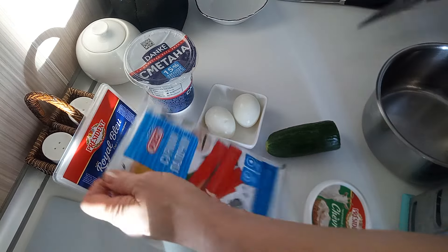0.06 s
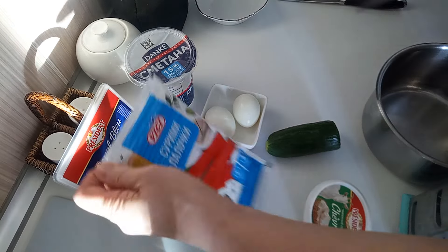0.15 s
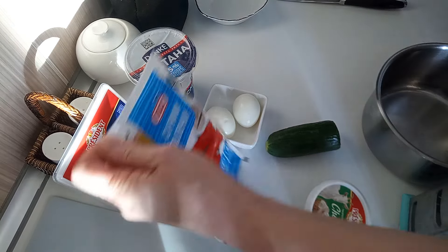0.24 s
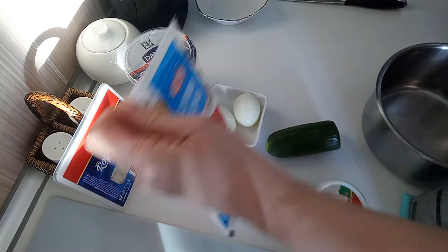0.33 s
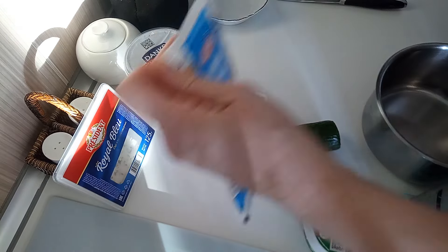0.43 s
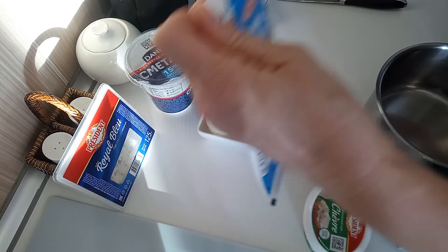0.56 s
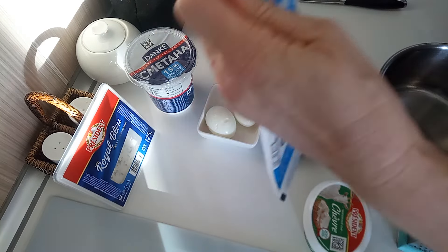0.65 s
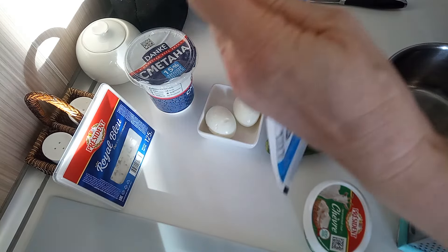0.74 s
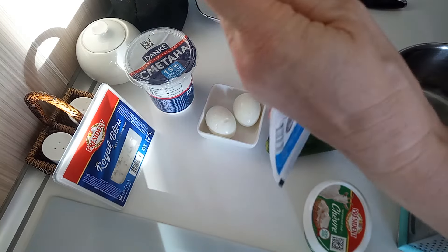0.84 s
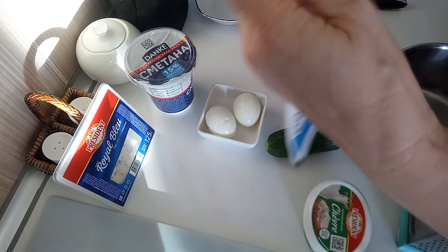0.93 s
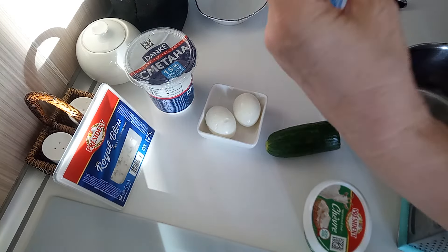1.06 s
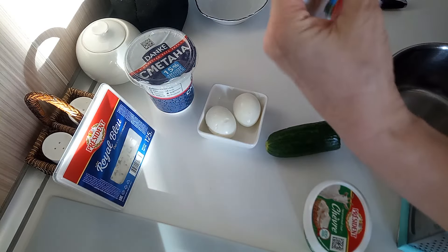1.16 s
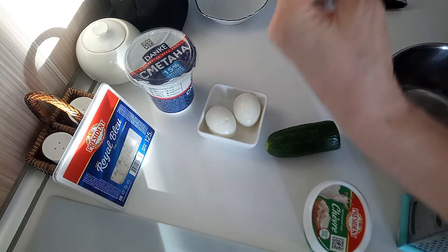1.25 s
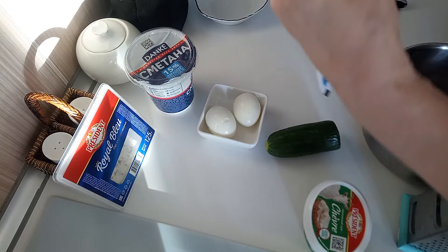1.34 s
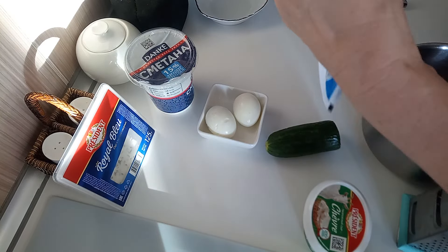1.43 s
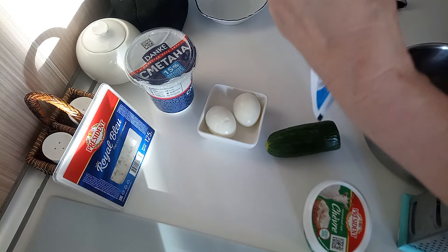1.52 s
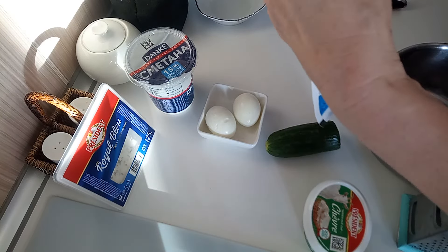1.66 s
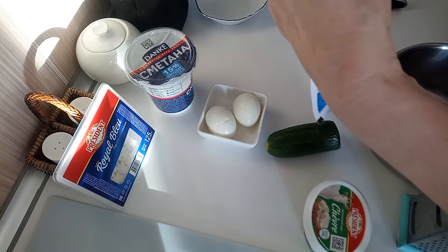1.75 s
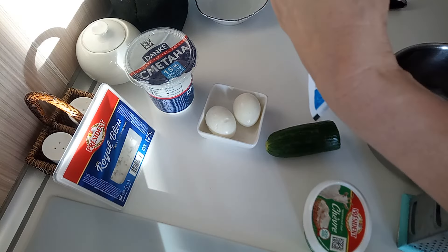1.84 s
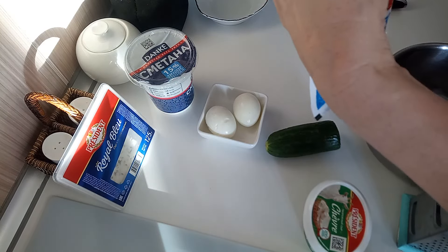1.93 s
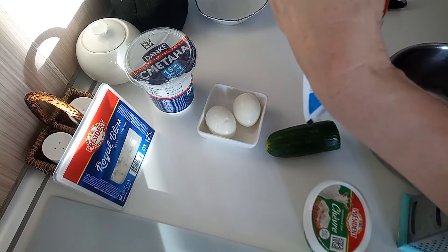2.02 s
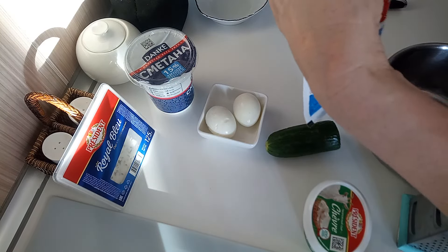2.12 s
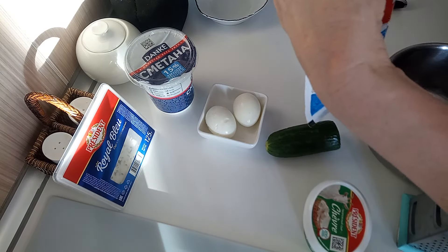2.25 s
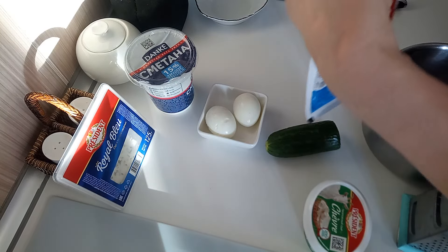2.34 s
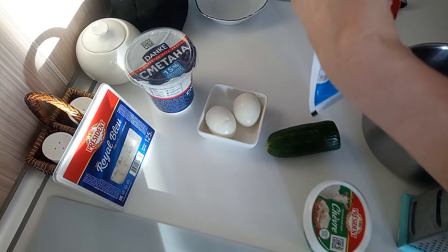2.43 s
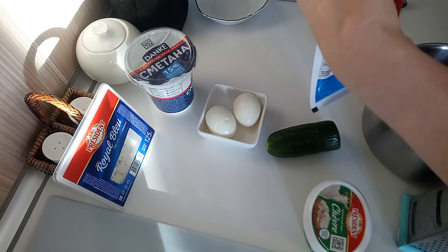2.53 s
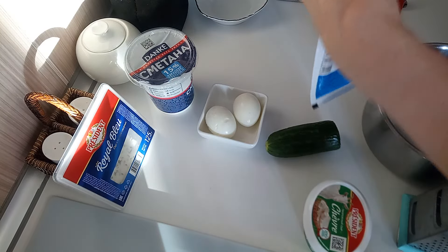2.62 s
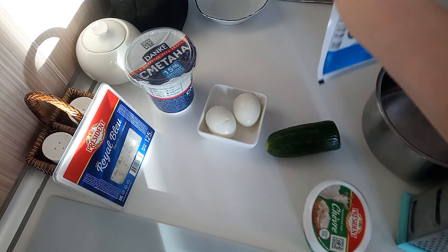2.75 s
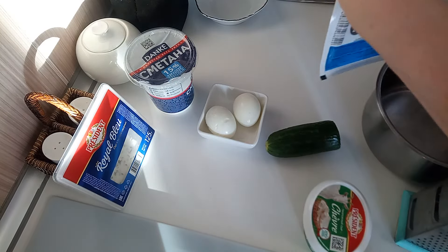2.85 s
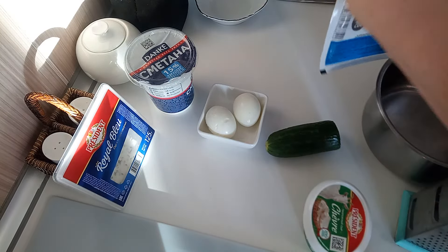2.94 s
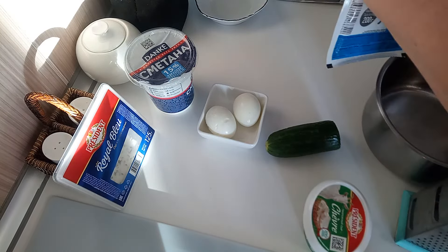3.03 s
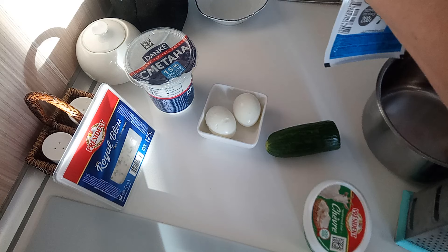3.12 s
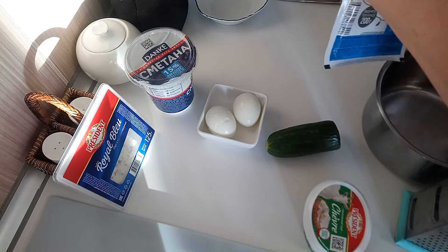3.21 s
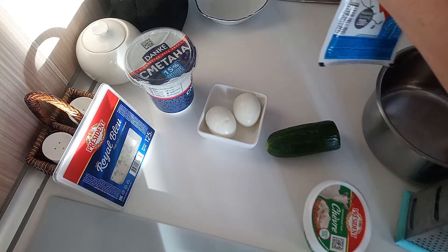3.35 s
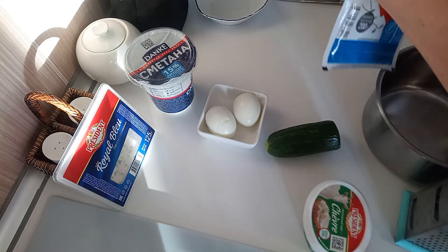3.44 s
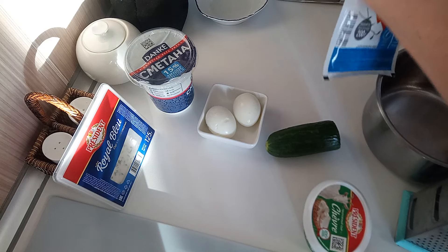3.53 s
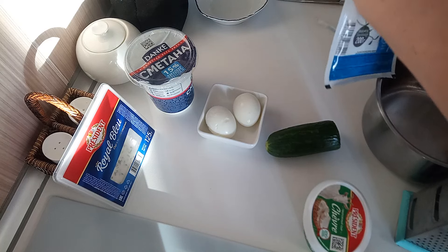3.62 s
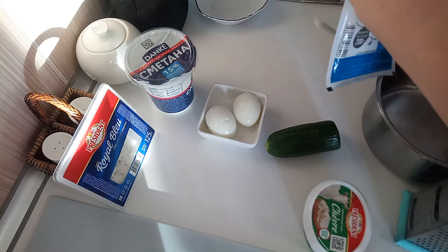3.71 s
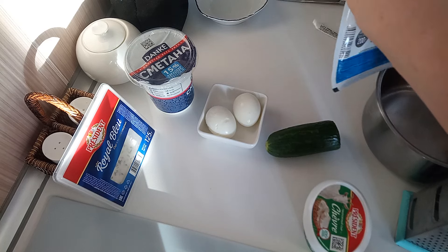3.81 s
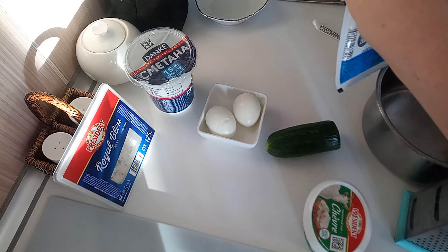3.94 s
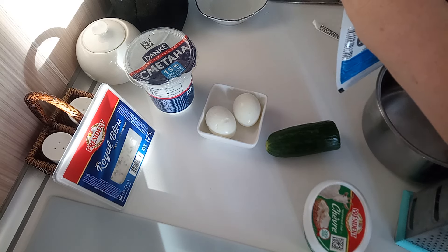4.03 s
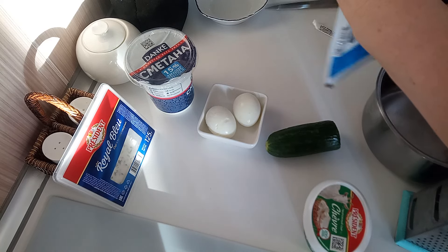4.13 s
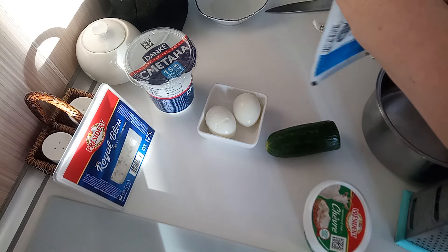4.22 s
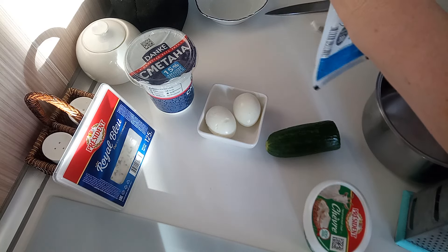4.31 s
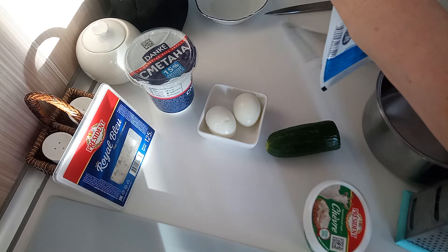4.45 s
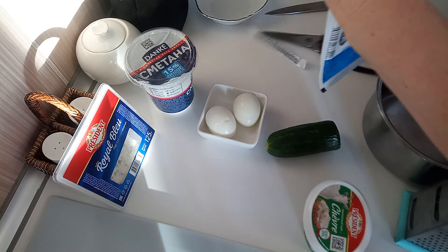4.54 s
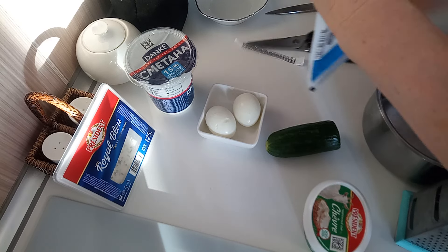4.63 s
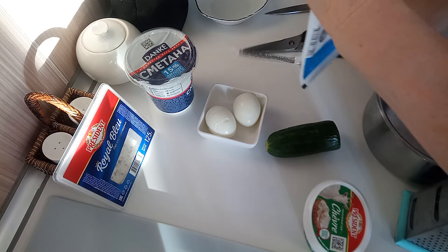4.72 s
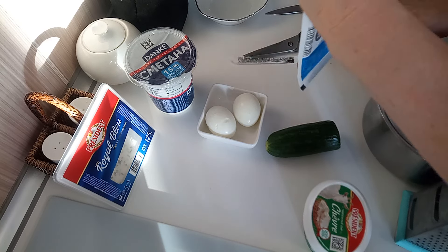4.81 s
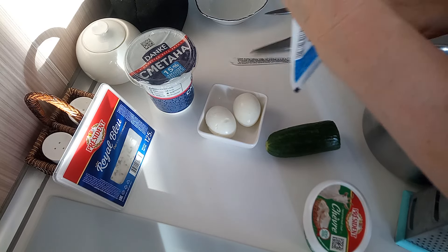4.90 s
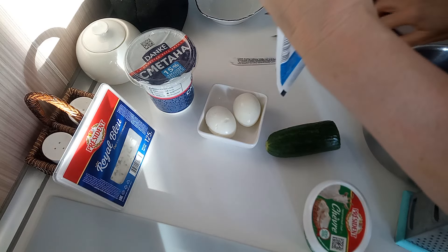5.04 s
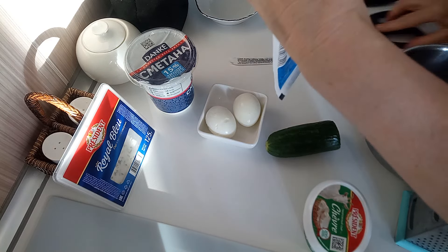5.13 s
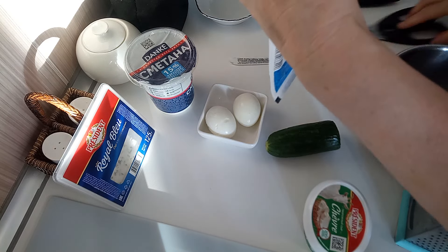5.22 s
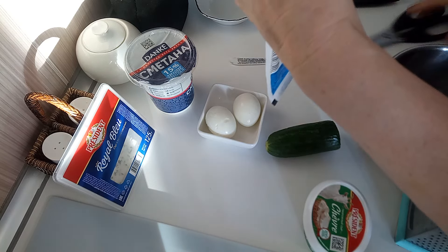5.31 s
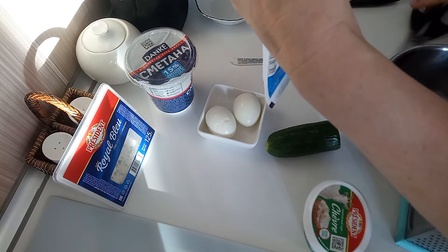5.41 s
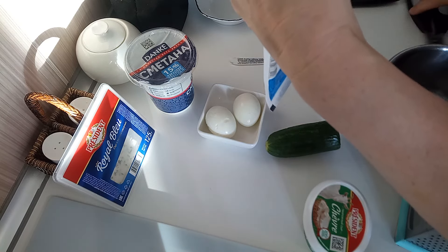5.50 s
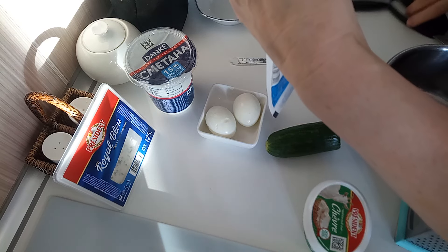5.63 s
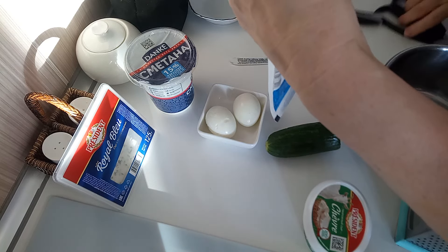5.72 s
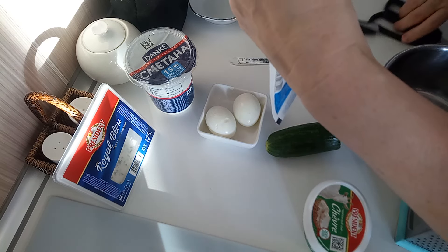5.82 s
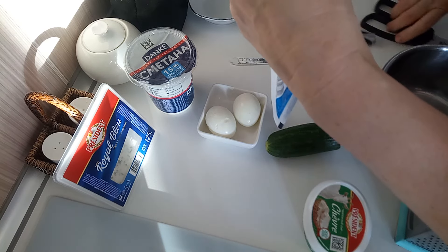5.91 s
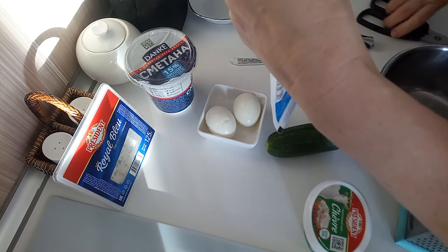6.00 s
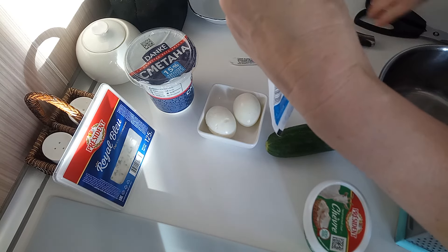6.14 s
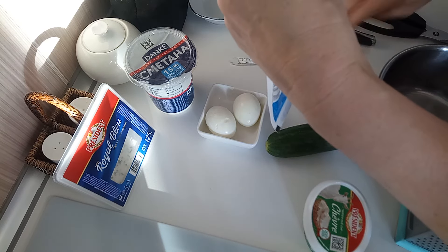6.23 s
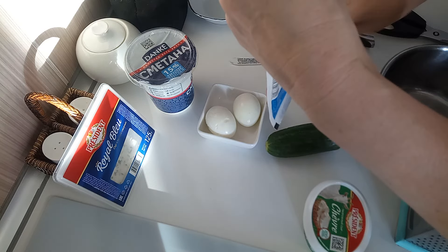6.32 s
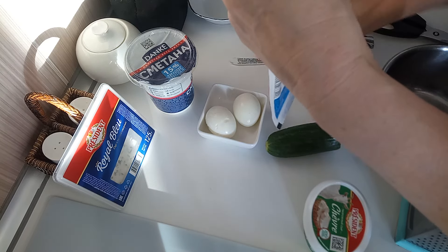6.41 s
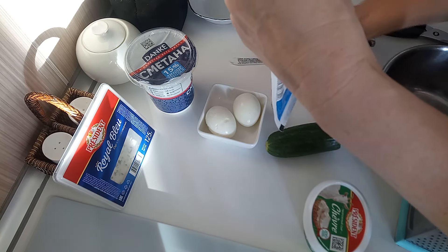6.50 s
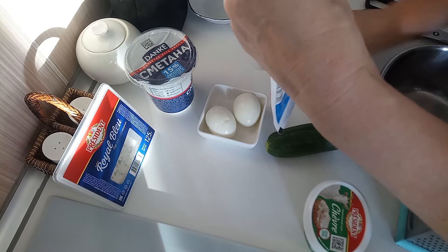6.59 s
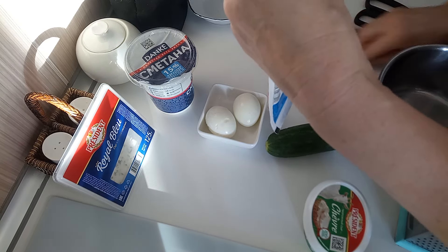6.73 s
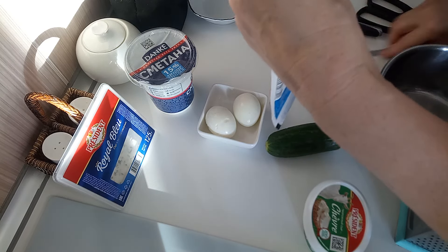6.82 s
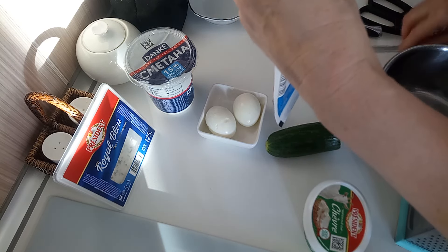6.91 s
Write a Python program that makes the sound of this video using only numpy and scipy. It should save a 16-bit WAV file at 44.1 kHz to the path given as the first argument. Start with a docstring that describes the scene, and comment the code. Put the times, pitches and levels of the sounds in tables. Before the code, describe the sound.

Quiet film crackle and clicks in a kitchen, followed by a much louder metallic clatter, a lingering knife ring and a hollow dragging scrape.

```python
"""In a small kitchen, close up, a plastic food packet is lifted off the counter and crinkles in the hand.
Steel scissors clatter among other utensils, set a knife blade ringing, then drag over the worktop.
Film is sprayed crackle and sharp snaps through shifting resonances; steel is noise cracks and decaying modes;
the drag is a scrape over a hollow drone. Soft bumps, a short reverberation and a faint hush lie beneath."""
import sys
import numpy as np
from scipy import signal
from scipy.fft import rfft, irfft, next_fast_len
from scipy.io import wavfile
from scipy.ndimage import uniform_filter1d, map_coordinates

SR = 44100
rng = np.random.default_rng(int(sys.argv[2]) if len(sys.argv) > 2 else 0)


def digitize_waveform(pressure):
    """Quantize a signal to 16-bit integers and store it at the path in sys.argv[1].

    Rows of a 2-D input are taken as channels; values are limited to [-1, 1].
    """
    field = np.atleast_2d(pressure).T
    bounded = np.clip(field, -1, 1)
    quanta = np.round(bounded * 32767).astype(np.int16)
    wavfile.write(sys.argv[1], SR, quanta)


N = 306936

# modes of the scissor blades: [freq_hz, level_db]
SCISSOR_MODES = [(797, -13), (2300, -15), (2680, -14), (3560, -14), (4166, -15), (4390, -11), (4530, -11),
                 (4980, -14), (5190, -6), (5305, -9), (6090, -13), (6720, -5), (7225, -12)]
# how long the scissors ring across the spectrum: [freq_hz, t60_s]
SCISSOR_T60 = [(800, 0.27), (2500, 0.15), (5200, 0.11), (7300, 0.13)]
# colour of steel cracking on steel or counter: [freq_hz, level_db_per_hz]
CRACK_COLOUR = [(150, -26), (500, 0), (1300, -1), (3200, -4), (5500, 3), (7000, -6), (8300, -21.5),
                (13500, -33.5), (15700, -27)]
FLEX_EDGE = 0.34  # share of a hand movement spent speeding up and slowing down


def amp(db):
    """Decibels to gain."""
    return 10 ** (np.asarray(db) / 20)


def unit(x):
    """Scale to rms 1."""
    return x / np.sqrt(np.mean(x ** 2) + 1e-20)


def along(points, hz):
    """Read a curve of (Hz, value) points on a log frequency axis."""
    f, v = np.transpose(points)
    return np.interp(np.log(hz + 1), np.log(f), v)


def curves(rows):
    """One value per sample for each column after the time."""
    s, *cols = np.transpose(rows)
    return [np.interp(np.arange(N) / SR, s, c) for c in cols]


def wobble(rate):
    """A smooth random curve, rate knots a second."""
    knots = rng.standard_normal(int(N * rate / SR) + 4)
    return map_coordinates(knots, [np.arange(N) * rate / SR])


def filtered(x, response):
    """Multiply the spectrum of x by a response of frequency."""
    m = next_fast_len(len(x) + SR // 4)
    return irfft(rfft(x, m) * response(np.fft.rfftfreq(m, 1 / SR)), m)[:len(x)]


def coloured(x, level_db, size=2048):
    """Pass x through a causal filter of unit energy with the given dB shape."""
    # keeping only the causal half of the cepstrum gives minimum phase
    cepstrum = irfft(np.log(amp(level_db(np.fft.rfftfreq(size, 1 / SR)))))
    cepstrum[size // 2:] = 0
    kernel = irfft(np.exp(2 * rfft(cepstrum)))
    return signal.fftconvolve(x, kernel / np.linalg.norm(kernel))[:len(x)]


def patchy(x, depth_db, width, length):
    """Resonances come and go: random gain patches, width bins wide and length frames long."""
    z = signal.stft(x, nperseg=512)[2]
    field = uniform_filter1d(rng.standard_normal(z.shape), width, 0)
    field = uniform_filter1d(field, length, 1)
    return unit(signal.istft(z * amp(depth_db * unit(field)), nperseg=512)[1][:N])


def fade(t60, length=SR // 4):
    """An exponential decay."""
    return np.exp(-np.log(1000) * np.arange(length) / SR / t60)


def add(track, s, x):
    """Mix x into the track at time s."""
    part = track[max(round(s * SR), 0):][:len(x)]
    part += x[:len(part)]


def strokes(rows, edge):
    """One rounded swell of gain for each (start, end, dB) movement."""
    gain = np.zeros(N)
    for start, end, db in rows:
        length = max(round((end - start) * SR), 2)
        add(gain, start, amp(db) * signal.windows.tukey(length, edge))
    return gain


def grains(rate, spread_db):
    """Random impulses of uneven size, about rate a second, rms 1."""
    sizes = amp(spread_db * np.clip(rng.standard_normal(N), -2, 2))
    return unit(sizes * rng.choice([-1, 1], N) * (rng.random(N) < rate / SR))


def burst(t60, tick=0, rise=0.00031):
    """A swelling, then dying spray of tiny contacts, which a sharp tick may lead."""
    swell = 1 - np.exp(-np.arange(SR // 4) / SR / rise)
    x = fade(t60) * swell * rng.standard_normal(SR // 4)
    x[0] += tick
    return x


def ring(modes, decay, attack, scatter_db):
    """Damped modes at fresh strengths and phases."""
    t = np.arange(SR // 2) / SR
    out = np.zeros(len(t))
    for hz, db in modes:
        strength = amp(db + scatter_db * rng.normal())
        partial = np.sin(2 * np.pi * (hz * t + rng.random()))
        out += strength * fade(along(decay, hz), len(t)) * partial
    return out * (1 - np.exp(-t / attack))


def note(hz, t60):
    """One dying partial."""
    return fade(t60, 2 * SR) * np.sin(2 * np.pi * hz * np.arange(2 * SR) / SR)


def clank(t60, count=24):
    """Many brief high modes, 2 to 11 kHz, different at every point of contact."""
    place, phase = rng.random((2, count, 1))
    t = np.arange(SR // 4) / SR
    partials = np.sin(2 * np.pi * ((2000 + 9000 * place) * t + phase))
    return unit(partials.sum(0)) * fade(t60)


def contact(db, tick, rise, spray_t60, clank_t60):
    """Steel cracks as a spray of contacts and a clank; harder blows are brighter and tick more sharply."""
    spray = burst(t60=spray_t60, tick=tick * amp(db), rise=rise)
    crack = 1.57 * spray + 0.53 * clank(t60=clank_t60)
    edge_hz = 5000 + 200000 * amp(db)
    return amp(db) * filtered(crack, lambda hz: 1 / (1 + (hz / edge_hz) ** 6))


KNIFE_S = 4.604  # one hard blow on a loose knife


def utensils():
    """Each contact cracks the steel; clashes also ring the scissors, and clashes and landings knock the counter."""
    # blade strikes blade: [start_s, strength_db, favoured_hz at the point of contact]
    clashes = [(4.123, -26.5, 5400), (4.255, -19, 5600), (4.300, -19.5, 6700), (4.342, -27.5, 5400),
               (4.381, -20.5, 5100), (4.485, -24, 4400), (4.544, -18, 4400), (4.568, -22.5, 4400),
               (5.685, -24.5, 5600), (5.764, -19.5, 6240), (5.865, -27, 5200), (5.905, -26.5, 6800),
               (6.833, -20, 2700), (6.942, -23.5, 5500)]
    # steel lands on the counter, which damps it: [start_s, strength_db]
    landings = [(4.056, -24.5), (4.088, -26.5), (4.219, -39), (4.529, -16), (4.593, -25), (4.65, -23),
                (4.944, -32), (4.963, -35), (5.666, -29.5), (5.752, -21.5), (5.806, -23.5), (5.976, -30.5),
                (6.121, -37), (6.56, -48), (6.857, -23.5), (6.905, -25.5), (6.957, -26.5)]
    # single ringing notes of other things on the counter, one of them knocked by the packet: # [start_s,
    # pitch_hz, level_db, t60_s]
    pings = [(0.942, 1841, -32, .085), (0.942, 3273, -34, .05), (4.255, 7225, -29, .45),
             (4.544, 4361, -12, 0.23), (4.544, 5500, -17, .13), (5.806, 1681, -18, 0.27)]
    # colour of the knocked counter: [freq_hz, level_db_per_hz]
    counter_colour = [(30, -51.5), (90, -20.5), (170, -15.5), (550, -6), (820, 4), (1000, -4), (1350, -0.5),
                      (2000, -13), (7000, -47)]
    favour_db, favour_octaves = 7, 0.25  # lift and width of the favoured modes
    # a clash's ring and a landing's knock grow faster than the blow: pivot strength in dB, then dB per dB
    ring_pivot_db, ring_grows = -22.5, 2.1
    knock_pivot_db, knock_grows = -24, 1.37

    cracks, knocks, steel = np.zeros((3, N))
    for s, db, favoured_hz in clashes:
        ring_db = ring_pivot_db + ring_grows * (db - ring_pivot_db)
        modes = []
        for hz, mode_db in SCISSOR_MODES:
            octaves = np.log2(hz / favoured_hz)
            modes.append((hz, mode_db + favour_db * np.exp(-(octaves / favour_octaves) ** 2)))
        add(cracks, s, contact(db - 1, tick=8, rise=0.004, spray_t60=0.039, clank_t60=0.089))
        add(knocks, s, amp(db - 8) * burst(t60=0.1, rise=0.0024))
        add(steel, s, amp(ring_db - 1) * ring(modes, SCISSOR_T60, attack=0.003, scatter_db=2.5))
    for s, db in landings:
        knock_db = knock_pivot_db + knock_grows * (db - knock_pivot_db)
        add(cracks, s, contact(db, tick=19, rise=0.0019, spray_t60=0.029, clank_t60=0.053))
        add(knocks, s, amp(knock_db) * burst(t60=0.067))
    add(cracks, KNIFE_S, contact(-12, tick=19, rise=0.002, spray_t60=0.039, clank_t60=0.061))
    for s, hz, db, t60 in pings:
        add(steel, s, amp(db) * note(hz, t60))

    cracks = coloured(cracks, lambda hz: along(CRACK_COLOUR, hz))
    knocks = coloured(knocks, lambda hz: along(counter_colour, hz))
    return amp(-5.5) * steel + amp(-2.5) * cracks + amp(-2) * knocks


def knife():
    """The struck knife blade rings on freely in long, separate modes."""
    # modes of the loose blade: [freq_hz, level_db, t60_s]
    blade_modes = [(1282, 3, 1.2), (2046, -12, 2), (2234, -10, 1.5), (2491, -5, 2.2), (2822, -3, 1.4),
                   (3214, -16, 2.4), (3661, -9, 1.3), (4194, -13, 1.5), (4720, -1, 1.1), (4927, -3, 1.05),
                   (4985, -10, 1.3), (5351, -12, 1.1), (6148, -7, .75), (6928, -12, .8)]
    out = np.zeros(N)
    add(out, KNIFE_S, amp(-32) * sum(amp(db) * note(hz, t60) for hz, db, t60 in blade_modes))
    return out


def drag():
    """Steel sticks and slips on the worktop: a fine scrape over a hollow drone, with blades chattering."""
    # the long drag across the worktop: [time_s, drone_db, scrape_db]
    long_drag = [(4.7, -91, -90), (4.76, -51, -43.5), (4.92, -44, -53), (4.99, -38, -47),
                 (5.27, -33.5, -42), (5.39, -37, -39.5), (5.56, -42, -41.5), (5.65, -43.5, -51),
                 (5.72, -90, -85)]
    # short pushes of steel: [start_s, end_s, drone_db, scrape_db]
    slides = [(4.618, 4.741, -34.5, -29), (5.637, 6.079, -37, -49), (6.088, 6.188, -44.5, -56.5),
              (6.538, 6.875, -58.5, -62.5), (6.83, 7.023, -44, -34.5)]
    # loose blades rattling as they slide: [start_s, end_s, level_db]
    chatter_moves = [(4.06, 4.211, -42.5), (4.25, 4.54, -37.5), (5.66, 6.08, -39.5), (6.58, 6.9, -61)]
    # resonances of handles and worktop: [freq_hz, width_hz, level_db]
    drone_modes = [(630.4, 26, -12.5), (779.4, 29, -3.5), (837.4, 29.5, -2), (916, 70, -6.5),
                   (1464, 110, -15.5)]
    # the drone's pitch sags and partly recovers: [time_s, pitch_ratio]
    pitch_sag = [(5.33, 1), (5.5, 0.87), (5.72, 0.93)]
    # colour of the scrape: [freq_hz, level_db_per_hz]
    scrape_colour = [(60, -29.5), (230, -5), (420, -11), (700, 5), (1500, 5), (2200, 2), (3200, -2),
                     (5800, -2), (6800, -4.5), (8000, -29), (16000, -57)]
    slide_edge, chatter_edge = 0.51, 0.54  # share of a movement spent speeding up and slowing down

    drone_db, scrape_db = curves(long_drag)
    droning = amp(drone_db) + strokes([(start, end, db) for start, end, db, _ in slides], slide_edge)
    scraping = amp(scrape_db) + strokes([(start, end, db) for start, end, _, db in slides], slide_edge)

    def body(f):
        """Resonances summed with alternating sign, their treble softened."""
        total = 0
        for k, (hz, width, db) in enumerate(drone_modes):
            resonance = 1j * f * width / (hz * hz - f * f + 1j * f * width)
            total = total + (-1) ** k * amp(db) * resonance
        return total / (1 + (f / 3200) ** 4)

    drone = unit(filtered(grains(rate=700, spread_db=5), body))
    # reading the drone more slowly lowers its pitch
    drone = map_coordinates(drone, [np.cumsum(curves(pitch_sag)[0])], mode="mirror")
    grit = patchy(grains(rate=3000, spread_db=5), depth_db=3, width=5, length=9)
    scrape = coloured(grit, lambda hz: along(scrape_colour, hz))
    jolts = grains(rate=250, spread_db=5.0)
    ringing = ring(SCISSOR_MODES, SCISSOR_T60, attack=0.00099, scatter_db=0.0)
    blades = unit(signal.fftconvolve(jolts, ringing)[:N])
    chatter = 0.35 * blades + coloured(grit, lambda hz: along(CRACK_COLOUR, hz))
    rubbing = amp(-2.5) * (droning * drone + scraping * scrape)
    return rubbing + strokes(chatter_moves, chatter_edge) * chatter


def slips():
    """Each larger slip of the drag makes the handles hoot for a few cycles."""
    # [start_s, level_db, pitch_hz]
    slip_rows = [(5.244, -24, 805), (5.272, -27.5, 860)]
    rise_s = 0.0054  # time to the peak of the hoot
    out, t = np.zeros(N), np.arange(SR // 4) / SR
    swell = (t / rise_s * np.exp(1 - t / rise_s)) ** 2
    for s, db, hz in slip_rows:
        add(out, s, amp(db) * swell * np.sin(2 * np.pi * hz * t))
    return out


def packet():
    """Flexing film sheds tiny crackles; now and then a whole crease snaps through."""
    # each movement of the hand flexes the film: [start_s, end_s, rustle_db]
    flexes = [(0, .24, -69.5), (.66, .86, -74), (0.23, 0.35, -54.5), (.87, .91, -51.5), (.95, 1.2, -48.5),
              (1.215, 1.27, -54), (1.345, 1.405, -47.5), (1.43, 1.6, -55.5), (1.922, 2.02, -61.5),
              (2.18, 2.28, -50.5), (2.35, 2.62, -49), (2.69, 2.97, -51.5), (3.02, 3.32, -49),
              (3.36, 3.55, -52), (3.87, 3.98, -63)]
    # the loudest creases snapping through: [start_s, level_db, colour_centre_hz]
    snaps = [(0.298, -37, 3000), (0.852, -35.5, 2420), (0.942, -30, 1880), (1.579, -34.5, 3200),
             (1.791, -35.5, 2980), (2.216, -19, 6100), (2.326, -31.5, 3720), (2.532, -26, 5650),
             (2.6, -30.5, 5300), (2.708, -34, 5460), (2.8, -32, 4000), (3.057, -25.5, 4150),
             (3.115, -31.5, 3620), (3.489, -25, 2540), (3.694, -36, 4063), (3.713, -21.5, 3920),
             (3.954, -37.5, 3220)]
    # colour of the film: [freq_hz, level_db_per_hz]
    film_colour = [(100, -10.5), (550, -12), (950, -3), (2000, 1), (5500, 2.5), (6700, 1.5), (8100, -21),
                   (12000, -33), (16000, -42)]

    effort = strokes(flexes, FLEX_EDGE)
    crackle = grains(rate=340, spread_db=6.5) + 0.7 * rng.standard_normal(N)
    # the folds change size as they bend, so their resonances keep shifting
    crackle = patchy(crackle, depth_db=4, width=5, length=11)
    flicker = amp(-2.0 + 1.8 * wobble(30.01))
    out = flicker * effort * coloured(crackle, lambda hz: along(film_colour, hz))
    for s, db, panel_hz in snaps:
        # the size of the buckling panel sets the colour
        panel = lambda hz: along(film_colour, hz) + 10 * np.exp(-np.log2((hz + 1) / panel_hz) ** 2)
        add(out, s, amp(db - 7) * coloured(burst(t60=0.04, tick=6), panel))
    return out


def palm():
    """Skin pressing on the packet rubs the film with a dull, grainy sound."""
    # [start_s, end_s, level_db]
    rubs = [(.41, .5, -54.5), (.86, 1.42, -62.5), (1.925, 2.015, -57)]
    # colour of the rub: [freq_hz, level_db_per_hz]
    palm_colour = [(100, -12), (300, 4), (600, -6), (950, 2.5), (2200, -4.5), (4000, -10.5), (9000, -45)]
    grain = grains(rate=1800, spread_db=3.5)
    return strokes(rubs, FLEX_EDGE) * coloured(grain, lambda hz: along(palm_colour, hz))


def bumps():
    """Soft contacts with the counter: a dull body with a faint scuff above it."""
    # [start_s, level_db, body_hz]
    bump_rows = [(0.008, -37, 645), (0.324, -43.5, 670), (0.417, -40.5, 530), (0.446, -42, 640),
                 (0.562, -46.5, 590), (1.951, -44.5, 320), (6.288, -53, 738), (6.367, -49, 598),
                 (6.572, -45.5, 383), (6.716, -51, 740)]
    out = np.zeros(N)
    for s, db, body_hz in bump_rows:
        def body(hz):
            """A broad hump round the body pitch, over a weak falling floor."""
            octaves = np.log2((hz + 1) / body_hz)
            hump = 1 / (1 + (octaves / 0.69) ** 6)
            scuff = amp(-22.0 - hz / 300)
            return 20 * np.log10(hump + scuff)
        add(out, s, amp(db) * coloured(burst(t60=0.098), body))
    return out


def kitchen(x):
    """Walls and cupboards answer with a decaying noise tail; treble dies first."""
    # reverberation: [freq_hz, t60_s]
    room_t60 = [(150, 0.72), (600, 0.36), (2000, 0.22), (6000, 0.21), (12000, 0.13)]
    hz, t, z = signal.stft(rng.standard_normal(SR // 2), SR, nperseg=256)
    decay = np.exp(-np.log(1000) * t / along(room_t60, hz)[:, None])
    tail = signal.istft(z * decay, SR, nperseg=256)[1]
    tail = np.pad(tail / np.linalg.norm(tail), (SR // 250, 0))  # starts 4 ms late
    return signal.fftconvolve(x, tail)[:N]


def room_tone():
    """The faint, slightly restless hush of the kitchen, as patchy coloured noise."""
    # colour of the hush: [freq_hz, level_db_per_hz]
    hush_colour = [(25, -9), (120, 6.5), (500, -0.5), (1600, -12), (5000, -12.5), (8500, -37.5)]
    hush = patchy(rng.standard_normal(N), depth_db=3.5, width=2, length=20)
    return amp(-68.5) * coloured(hush, lambda hz: along(hush_colour, hz))


def scene():
    """Packet and utensils at the counter, with the room round them."""
    film = packet() + palm()
    thuds = bumps()
    metal = utensils() + drag() + slips()
    blade = knife()
    wet = kitchen(amp(-10.0) * film + amp(-12.5) * thuds + amp(-5.5) * metal + amp(-12.5) * blade)
    return (film + thuds + metal + blade + wet + room_tone())[None]


def record(dry):
    """The microphone loses the deepest bass; the recorder keeps nothing above its band limit."""
    top_hz, bass_hz = 16200, 50
    band = lambda hz: np.clip((top_hz - hz) / 300 + 0.5, 0, 1)
    return filtered(dry[0], lambda hz: band(hz) * hz ** 2 / np.hypot(hz ** 2, bass_hz ** 2))[None]


dry = scene()
out = record(dry)
digitize_waveform(out)
```